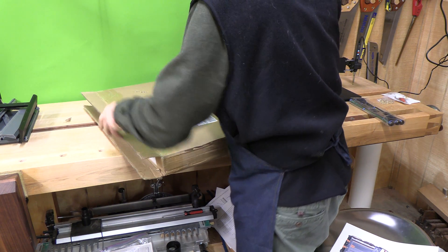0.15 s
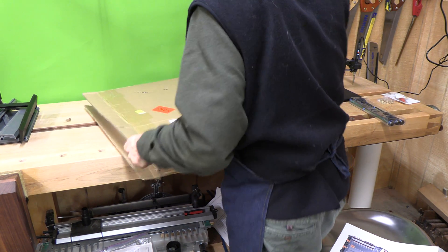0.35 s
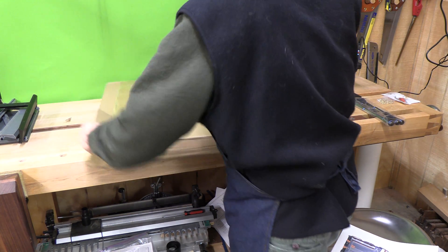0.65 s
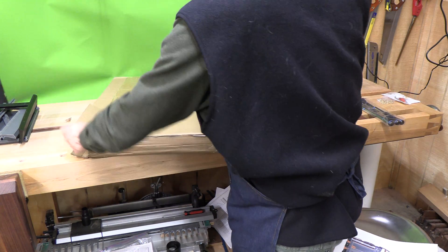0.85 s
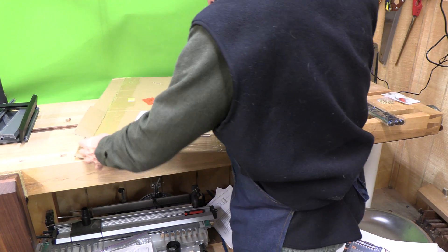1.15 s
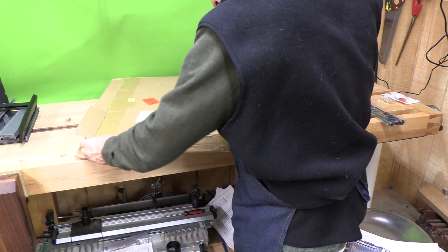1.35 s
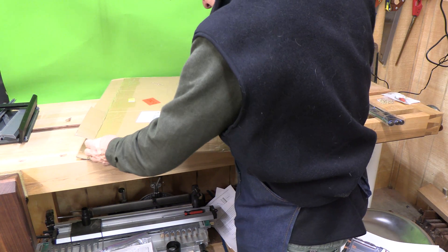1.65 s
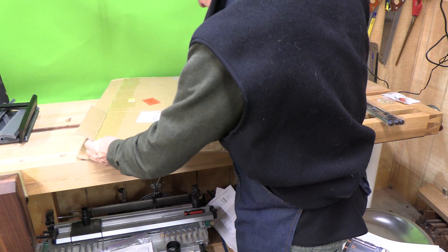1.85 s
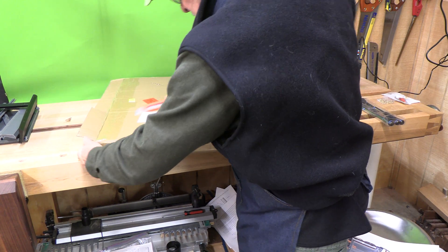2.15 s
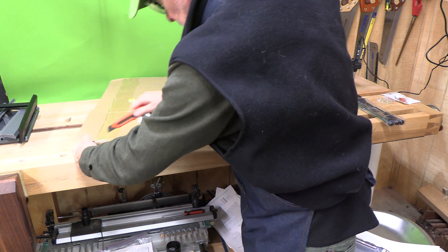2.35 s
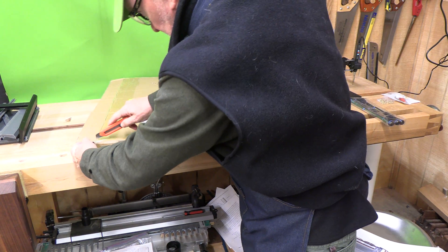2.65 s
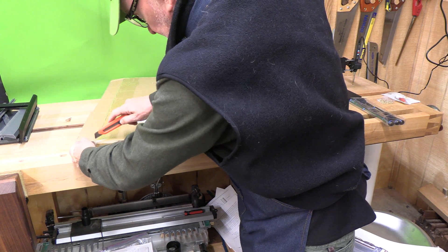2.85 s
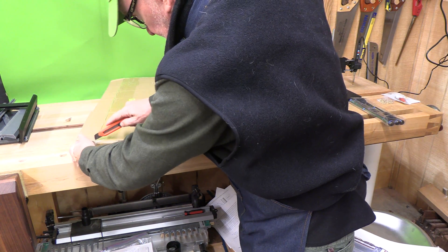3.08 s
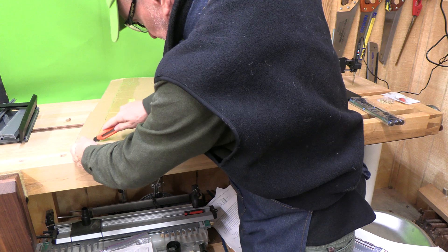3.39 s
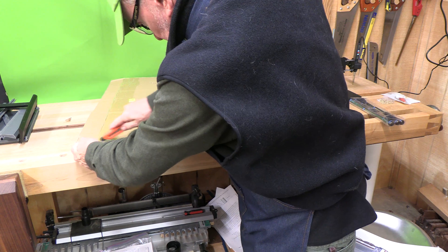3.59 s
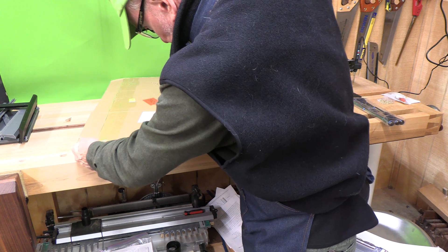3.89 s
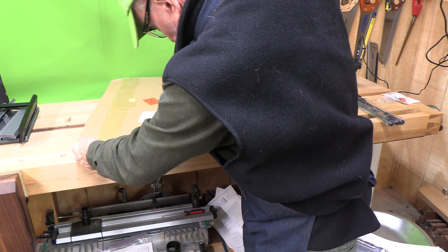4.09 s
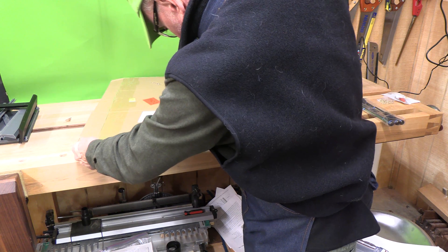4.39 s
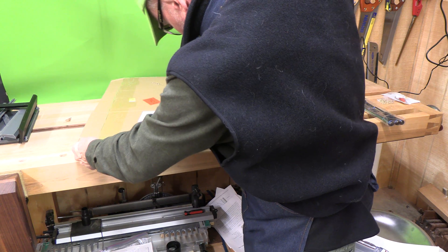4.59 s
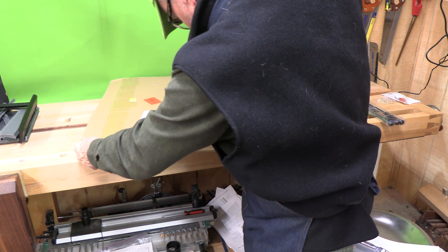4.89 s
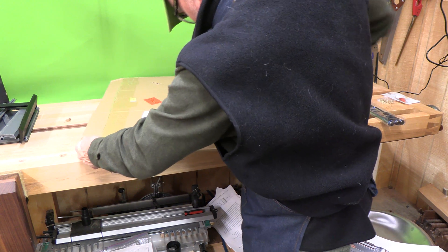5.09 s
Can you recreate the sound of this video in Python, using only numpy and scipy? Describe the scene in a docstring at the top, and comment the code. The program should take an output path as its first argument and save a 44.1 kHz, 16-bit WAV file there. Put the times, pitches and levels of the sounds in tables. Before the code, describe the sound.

In a small workshop, close to a mono microphone, hands flip a flat cardboard box on a wooden bench: rustling, hollow knocks and crisp snaps. Two bright knife-slider clicks follow, then quiet fumbling with faint ticks and one sharp snap. Finally a blade rasps loudly through the board and stops with a jerk and a tiny ping.

```python
"""A cardboard rustle is heard first, then dull knocks and sharp snaps: hands turn a flat box over on a
wooden bench in a small workshop, near a mono microphone. A knife's slider ticks, then its blade rasps
along the board, and a short ping sounds as the cut ends. Rubbing is noise made of many small slips,
knocks and snaps are short bursts of shaped noise, and ticks and pings are fading sine waves."""
import sys
import numpy as np
from scipy import signal
from scipy.io import wavfile
from scipy.ndimage import uniform_filter1d

SR = 44100
rng = np.random.default_rng(int(sys.argv[2]) if len(sys.argv) > 2 else 0)


def to_wav(s):
    """Save 16-bit WAV."""
    ch = np.atleast_2d(s).T  # columns
    pcm = np.round(np.clip(ch, -1, 1) * 32767)  # PCM
    wavfile.write(sys.argv[1], SR, pcm.astype(np.int16))


N = 230710

# steady room tone, the shape of its spectrum: f/Hz, level/dB per Hz
FLOOR = [(15, 2), (25, -22.5), (47, -11.5), (102, -15.5), (242, -9.5), (863, -40), (988, -24), (1840, -20),
         (5430, -45.5), (16000, -44)]
FLOOR_DB = -55.5  # overall rms level

# board rubbing on bench and hands: t/s, level of the fizz/dB, level of the body/dB
RUSTLE = [(0, -40.5, -44), (.11, -40.5, -35), (.24, -39, -43), (.37, -40, -36), (.55, -46, -42.5),
          (.74, -42, -39), (.83, -36, -33), (.92, -38.5, -33), (.98, -41.5, -39), (1.07, -43, -32),
          (1.21, -50, -43), (1.5, -44.5, -39.5), (1.68, -50.5, -45), (1.85, -57, -54), (2.13, -55, -53),
          (2.49, -50.5, -45), (2.65, -51, -50), (2.8, -62, -50), (3, -64, -64), (3.1, -53, -62),
          (3.36, -49, -51), (3.5, -49, -48), (3.65, -48, -47), (3.7, -34, -25.5), (3.77, -26, -22)]
# hiss of the rubbed surface: f/Hz, level/dB per Hz
FIZZ = [(880, -30.5), (1500, -7), (2270, -7.5), (2860, -16), (3270, -3), (4010, -3.5), (4350, -1),
        (7410, -0.5), (9000, -10), (11700, -37.5), (19800, -120)]
# body of the board held down by hand: f/Hz, level/dB per Hz
HELD_BODY = [(71, -28.5), (120, -3), (300, -0.5), (759, -7), (823, -5.5), (1530, -15.5), (3000, -22.5),
             (3900, -74), (6600, -120)]
# low rumble of the bench: f/Hz, level/dB per Hz
RUMBLE = [(25, -38), (45, -22), (65, -8), (87, 2.5), (119, 2), (151, -3.5), (250, -11), (400, -37)]
# highest treble, which also dulls the snaps and swipes above 8 kHz: f/Hz, level/dB per Hz
TOP = [(4410, -28.5), (7500, -4), (12500, -15.5), (15100, -23.5), (16000, -53)]
# ringing of the rubbed board: f/Hz, width/Hz, level over the spectrum/dB
BOARD = [(432, 71, 2.5), (930, 30, 1), (1300, 44, 2), (4700, 250, 1), (5100, 280, 3)]
# how rumble follows the body (row 1) and top treble the fizz (row 2):
# level when the leader is at PIVOT_DB/dB, slope/dB per dB
RUSTLE_LAW = [(-47, .75), (-43, .9)]
PIVOT_DB = -35
# short slides of a flap, finger or blade: t/s, level/dB, length/s, centre f/Hz, spread/octaves
SWIPES = [(0, -26.5, .025, 4170, 1.6), (.162, -32, .1, 5500, .7), (.185, -17.5, .0064, 1680, .37),
          (.202, -24, .012, 1520, .23), (.265, -37, .068, 6130, .3), (.365, -31, .09, 5000, 1.1),
          (.376, -34, .07, 1540, .12), (.45, -34, .058, 5000, 1.5), (.45, -32.5, .032, 890, .54),
          (.494, -18, .014, 5670, .44), (.514, -26, .065, 5200, 1), (.521, -21, .026, 1170, .56),
          (.756, -32, .14, 4100, .35), (.757, -30.5, .09, 580, .15), (.845, -25, .05, 700, .48),
          (.904, -38, .036, 5000, .94), (.99, -30, .043, 5500, .86), (.994, -23.5, .08, 1880, .7),
          (1.215, -38, .2, 3040, 1), (1.413, -36, .015, 3410, .5), (2.108, -46, .11, 4400, .4),
          (2.237, -35, .014, 4120, .7), (2.471, -41, .052, 4950, 1), (2.582, -40.5, .051, 4730, 1.5),
          (2.594, -38, .02, 1490, .48), (2.818, -42, .1, 4250, 1.34), (3.134, -44, .035, 3780, .7),
          (3.184, -33, .02, 4600, 1), (3.425, -32.5, .065, 4870, 1.46), (3.59, -32.5, .11, 5000, 1.4),
          (3.642, -13, .025, 5500, 1.46), (3.693, -10, .0083, 5000, 1.5), (3.708, -11.5, .017, 5000, 1.5),
          (3.727, -10.5, .018, 5000, 1.5), (4.399, -22.5, .06, 3230, 1.3), (4.416, -29.5, .2, 1380, .47),
          (5.041, -15.5, .012, 5300, .88), (5.073, -15, .015, 3880, 1.3), (5.086, -21, .041, 199, .3),
          (5.101, -10.5, .014, 3850, .85), (5.108, -24, .054, 900, .3), (5.115, -23, .045, 6000, 1.1),
          (5.193, -24, .012, 5000, 1)]

# dull knocks of the box: t/s, peak level before the lift in scene()/dB, centre f/Hz,
# time to fall 60 dB (t60)/s, first contact over the push/dB
KNOCKS = [(.085, -31, 350, .06, 28), (.162, -12, 300, .12, 28), (.262, -25, 610, .09, 26),
          (.497, -14, 1110, .08, 40), (.505, -14, 620, .1, 20), (.52, -10, 1080, .08, 38),
          (.679, -29.5, 447, .13, 27), (.855, -15.5, 560, .11, 22), (.996, -5, 290, .25, 26),
          (1.341, -34, 338, .08, 28), (1.56, -17, 520, .095, 13), (1.641, -31, 368, .14, 27),
          (1.886, -30, 428, .1, 19), (2.044, -34, 326, .17, 25), (2.098, -36, 383, .2, 15),
          (2.29, -32, 280, .17, 22), (2.396, -35, 283, .2, 19), (2.692, -20, 450, .09, 23),
          (3.035, -34, 300, .12, 23), (3.137, -31, 1100, .09, 21), (3.178, -32, 452, .14, 11),
          (3.275, -32, 445, .08, 21), (3.43, -29, 330, .15, 10), (3.598, -26, 374, .3, 15),
          (3.643, -13, 500, .1, 18), (3.694, -11, 430, .15, 18), (3.731, -8, 270, .12, 22),
          (4.396, -14, 398, .16, 20), (4.482, -18.5, 441, .14, 20), (4.954, -22, 388, .13, 28),
          (5.046, -23, 450, .1, 28), (5.083, -14, 150, .14, 20), (5.102, -15.5, 200, .15, 9)]
# ringing modes of the cardboard panel: f/Hz, width/Hz, level/dB
PANEL = [(137, 55, 3), (185, 90, -18.5), (245, 34, -1), (278, 102, 2.5), (396, 94, 1.5), (555, 117, 0.5),
         (710, 210, -4), (884, 127, 0.5), (1100, 300, -5.5), (1280, 174, 2), (1483, 600, -6.5),
         (2160, 350, -7.5)]
KNOCK_OCTAVES = 1.15  # spread around the centre of a knock
BENCH_HZ, BENCH_T60 = 105, 1.1  # lowest mode of the bench top, Hz and s
BENCH_DB, THUMP_DB, THUMP_HZ = -33, -21, 130  # bench ring and low thump, dB over the knock's peak
# how long each pitch lingers in the workshop: f/Hz, t60/s
ROOM = [(200, 0.37), (530, 0.099), (1390, 0.54), (3680, 0.54), (9700, 0.057)]

# snaps of fibres, tape and flap edges: t/s, peak level/dB, centre f/Hz, room tail level/dB
SNAPS = [(.1151, -25, 6900, -17), (.1454, -14, 6740, -20), (.1733, -16, 4600, -17), (.1885, -9, 5100, -25),
         (.2054, -9, 5400, -25), (.4865, -16, 5800, -23), (.5, -9, 4930, -19), (.5206, -7, 7280, -30),
         (.525, -4, 5850, -30), (.5385, -14, 7200, -31), (.683, -29, 5790, -25), (.713, -17, 4610, -22),
         (1.0785, -23, 3920, -25), (1.2226, -23, 5780, -14), (1.3404, -19, 3950, -18),
         (1.5604, -24, 3760, -12), (1.7884, -33, 3370, -22), (2.0856, -33, 7000, -23),
         (2.1752, -30, 4570, -25), (2.2257, -27, 4740, -23), (2.256, -27, 7520, -32),
         (2.4854, -28, 4550, -28), (2.5666, -31, 4800, -19), (2.6923, -1.5, 4920, -17),
         (2.8606, -20, 4220, -19), (2.9272, -34, 3070, -33), (3.0401, -13, 4200, -20),
         (3.0796, -34, 2600, -20), (3.1399, -23, 3940, -18), (3.1754, -15, 4130, -18),
         (3.2344, -32, 4310, -21), (3.2793, -18, 5100, -25), (3.38, -15, 4000, -30),
         (3.461, -17, 7160, -40), (3.5433, -34, 3900, -31), (3.6015, -18, 6180, -25),
         (3.7994, -10, 7300, -20), (4.3992, -7, 3030, -18), (4.4822, -11, 5670, -9),
         (4.782, -19, 6140, -19), (4.9353, -16, 6620, -23), (5.066, -14, 3370, -27),
         (5.0744, -3, 3200, -28), (5.1033, -14, 5390, -27), (5.131, -10, 6370, -25),
         (5.1444, -8, 4840, -28)]
# early reflections from bench and walls: delay t/s, level over the room tail/dB
ECHOES = [(.0035, 5.5), (.007, -1), (0.0185, -5), (0.026, -5.5)]
SNAP_T60, SNAP_OCTAVES = .0075, 1.15  # s, spread of the wide part of the colour
CRACKLES, CRACKLE_DB = 10, 14  # number of faint random snaps, most dB over the fizz
CRACKLE_LOW_HZ, CRACKLE_HIGH_HZ, CRACKLE_TAIL_DB = 3000, 8000, -25

# ticks of the knife's slider: t/s, peak level/dB, pitch f/Hz
TICKS = [(1.1986, -30, 2330), (1.3118, .4, 2200), (1.4336, -1.5, 2316), (1.7594, -27, 2110),
         (1.801, -37, 2030), (1.8407, -35, 2230), (1.8696, -32, 2180), (1.9168, -28, 2030),
         (1.9889, -31, 2240), (2.029, -37, 1930), (2.051, -23, 2290), (2.1011, -35, 1950),
         (2.1345, -29, 1960), (2.2115, -33, 2100), (2.2405, -22, 2290), (2.345, -34, 1900)]
# ringing modes of the knife's handle: multiple of the pitch, level/dB
KNIFE = [(1, 9.5), (1.68, 10), (2.42, 1), (2.85, 0.5), (3.9, -0.5), (5.2, -12)]
TICK_T60, T60_PER_DB = .008, -.00012  # s at 0 dB, s per dB: harder ticks are shorter
UPPER_PER_DB, TICK_TAIL_DB = .27, -20  # harder ticks are brighter (dB per dB); room tail

# the slit board sounds in two bands as the blade moves:
# t/s, low band f/Hz, low band level over the fizz/dB, high band f/Hz
SLIT = [(3.74, 5550, -11, 7500), (3.95, 5750, -14, 7500), (4.1, 4470, -13, 7300), (4.3, 3340, -14, 7700),
        (4.42, 3540, -8, 7540), (4.62, 3450, -8, 6800), (4.9, 3390, -4, 6540), (5.04, 3400, -7, 6200),
        (5.15, 3430, -20, 7400)]
SLIT_HIGH_DB = -9  # high band over the fizz of the rasp
# the blade's long pull and the jerk that ends it: t/s, level of the fizz/dB, level of the body/dB
RASP = [(3.76, -23.5, -23), (3.83, -22, -24), (3.94, -26, -30.5), (3.964, -24, -26.5), (4.2, -28.5, -31.5),
        (4.28, -21, -27), (4.38, -25, -29), (4.404, -20, -19.5), (4.56, -25, -27), (4.65, -25, -22.5),
        (4.73, -31.5, -32), (4.812, -37.5, -40), (4.928, -35, -36.5), (4.96, -29, -31), (5.033, -27.5, -27),
        (5.037, -17.5, -19), (5.111, -23.5, -18), (5.147, -18, -24), (5.173, -28, -29),
        (5.203, -28.5, -29.5), (5.23, -42, -41)]
# body of the board under the blade: f/Hz, level/dB per Hz
BODY = [(30, -35), (80, -12), (120, -6.5), (266, -3.5), (304, -3.5), (443, 0), (770, -5.5), (869, -3),
        (2260, -10), (3000, -17.5), (3900, -37.5), (6600, -120)]
# the same two following rules as RUSTLE_LAW: level at PIVOT_DB/dB, slope/dB per dB
RASP_LAW = [(-50, .5), (-44, 1.2)]

# short tone as the cut ends: t/s, peak level/dB
PINGS = [(5.1965, -21), (5.203, -18)]
# its close modes: f/Hz, level/dB, t60/s
PING = [(2380, -2, .05), (2482, 0, .08), (2600, -9, .04)]

EDGE_HZ = 16100  # upper band limit of the output


def amp(db):
    """Turns dB into a gain."""
    return 10 ** (np.asarray(db) / 20)


def evened(x):
    """Scales a signal to an rms of 1."""
    return x / np.sqrt(np.mean(x ** 2) + 1e-20)


def read(points, hz):
    """Reads a table between its points on a log-frequency axis."""
    f, value = np.transpose(points)
    return np.interp(np.log(hz + 1), np.log(f + 1), value)


def add(mix, s, peak_db, sound):
    """Mixes a sound in at time s with the given peak."""
    part = mix[max(round(s * SR), 0):][:len(sound)]
    part += amp(peak_db) * sound[:len(part)] / abs(sound).max()


def colour(x, gain):
    """Filters by a gain curve over Hz; like a real body, it answers only after it is driven."""
    hz = abs(np.fft.fftfreq(4096, 1 / SR))
    log_gain = np.log(np.maximum(gain(hz), 1e-5))
    spectrum = np.exp(np.conj(signal.hilbert(log_gain)))  # minimum phase
    taps = np.fft.ifft(spectrum).real[:2048]
    return signal.oaconvolve(x, taps)[:len(x)]


def hump(hz, centre_hz, octaves):
    """A bell-shaped gain on a log-frequency axis."""
    return np.exp(-.5 * (np.log2((hz + 1) / centre_hz) / octaves) ** 2)


def dulled(hz):
    """Gain that is level up to 8 kHz, then follows the top treble."""
    return amp(read(TOP, np.maximum(hz, 8000)))


def patchy(x, patch_db):
    """Colour drifts in random patches of time and pitch, as when parts of the board are held or let go."""
    hz, t, z = signal.stft(x, SR, nperseg=512, noverlap=384)
    patches = rng.standard_normal(z.shape[::-1]).T
    patches = uniform_filter1d(patches, size=4, axis=0)
    patches = evened(uniform_filter1d(patches, size=40, axis=1))
    return signal.istft(z * amp(patch_db * patches), SR, nperseg=512, noverlap=384)[1][:N]


def room_tone():
    """Steady noise shaped by the room's own spectrum."""
    return amp(FLOOR_DB) * evened(colour(rng.standard_normal(N), lambda hz: amp(read(FLOOR, hz))))


def friction(per_s, spread_db, smooth, flutter_db):
    """Fibres slip as dense clicks of uneven size over a smooth hiss; the pressure flutters."""
    happens = rng.random(N) < per_s / SR
    size = amp(spread_db * np.minimum(rng.exponential(1, N), 5)) * happens
    slips = evened(size * rng.standard_normal(N))
    wander = uniform_filter1d(rng.standard_normal(N), 500)
    wander = evened(uniform_filter1d(wander, 500))
    drive = smooth * rng.standard_normal(N) + (1 - smooth) * slips
    return amp(flutter_db * wander), drive


def rub(rows, law, body, per_s, spread_db, smooth, flutter_db):
    """Friction drives the fizz of the surface, the body of the board and the rumble of the bench."""
    s, fizz_db, body_db = np.transpose(rows)
    (rumble_base, rumble_slope), (top_base, top_slope) = law
    rumble_db = rumble_base + rumble_slope * (body_db - PIVOT_DB)
    top_db = top_base + top_slope * (fizz_db - PIVOT_DB)
    t = np.arange(N) / SR
    flutter, drive = friction(per_s, spread_db, smooth, flutter_db)

    def ringing_db(hz):
        return sum(d / (1 + (2 * (hz - f) / w) ** 2) for f, w, d in BOARD)

    out = np.zeros(N)
    for shape, db in zip((FIZZ, body, RUMBLE, TOP), (fizz_db, body_db, rumble_db, top_db)):
        layer = evened(colour(drive, lambda hz: amp(read(shape, hz) + ringing_db(hz))))
        out += amp(np.interp(t, s, db, -120, -120)) * layer
    return out * evened(flutter)


def swipes():
    """Grainy friction noise sets in fast, weakens as the piece slides and leaves a fading room tail."""
    out, t = np.zeros(N), np.arange(16384) / SR
    drive = friction(4000, 4.0, 0.75, 0)[1]
    starts = rng.integers(0, N - len(t), len(SWIPES))
    for (s, db, length, centre_hz, octaves), at in zip(SWIPES, starts):
        grain = drive[at:at + len(t)]
        slide = evened(colour(grain, lambda hz: hump(hz, centre_hz, octaves) * dulled(hz)))
        onset = np.clip(t / (0.074 * length), 0, 1)
        sliding = onset * np.clip((0.91 * length - t) / (0.94 * length), 0, 1)
        fading = amp(-13 - 60 * np.maximum(t - length, 0) / 0.19) * np.clip(t / length, 0, 1)
        part = out[round(max(s, 0) * SR):][:len(t)]
        part += (amp(db) * slide * (sliding + fading))[:len(part)]
    return out


def knocks():
    """A hard contact and a rough push ring the panel modes; the bench below thumps and rings."""
    out, t, long = np.zeros(N), np.arange(8192) / SR, np.arange(SR // 2) / SR
    bench = np.sin(2 * np.pi * BENCH_HZ * long) * amp(-60 * long / BENCH_T60)
    bench *= 1 - np.exp(-long / 0.005)  # soft start

    def modes(hz):
        # neighbouring modes move in opposite directions
        return abs(sum((-1) ** k * amp(d) / (1 + 2j * (hz - f) / w) for k, (f, w, d) in enumerate(PANEL)))

    def radiated(hz):
        return 1 / np.sqrt(1 + (210 / (hz + 1)) ** 4)  # a small panel gives off little bass

    noises = rng.standard_normal((len(KNOCKS), 8192))
    for (s, db, centre_hz, t60, contact_db), noise in zip(KNOCKS, noises):
        push = noise * (1 - np.exp(-t / 0.0036)) * amp(-60 * t / t60)
        add(out, s, db + THUMP_DB, colour(push, lambda hz: hump(hz, THUMP_HZ, .75)))
        add(push, .002, contact_db, np.ones(1))  # the contact is a single click
        spot = lambda hz: hump(hz, centre_hz, KNOCK_OCTAVES)
        add(out, s, db, colour(push, lambda hz: modes(hz) * radiated(hz) * spot(hz)))
        add(out, s, db + BENCH_DB, bench)
    return out


def workshop(x, tail_db):
    """Room reflections: sparse taps of random sign, each band dying at its own speed."""
    taps = np.zeros(SR // 2)
    at = np.arange(200, SR // 2 - 20, 20)
    taps[at + rng.integers(0, 20, len(at))] = rng.choice([-1., 1.], len(at))
    hz, t, z = signal.stft(taps, SR, nperseg=256)
    decay = amp(-60 * t / read(ROOM, hz)[:, None])
    tail = signal.istft(z * decay, SR, nperseg=256)[1]
    return x + signal.fftconvolve(x, amp(tail_db) * tail / np.linalg.norm(tail))[:N]


def with_tail(click, noise, tail_db, gain):
    """Adds early echoes and a fading noise tail, with fresh noise for every click."""
    t = np.arange(len(noise)) / SR
    tail = evened(colour(noise, gain)) * amp(tail_db - 60 * t / 0.16) * (1 - np.exp(-t / 0.001))
    add(tail, 0, 0, click)
    for delay, db in ECHOES:
        add(tail, delay, db + tail_db, click)
    return tail


def crackle():
    """Rows of faint snaps at random moments, whose peaks follow the fizz of the rustle."""
    when, pitch, size = rng.random((CRACKLES, 3)).T
    s, fizz_db, _ = np.transpose(RUSTLE)
    when = when * s[-1]
    peak_db = np.interp(when, s, fizz_db) + CRACKLE_DB * size
    centre_hz = CRACKLE_LOW_HZ + (CRACKLE_HIGH_HZ - CRACKLE_LOW_HZ) * pitch
    return list(zip(when, peak_db, centre_hz, np.full(CRACKLES, CRACKLE_TAIL_DB)))


def snaps():
    """A crack of noise that starts at once, coloured by the piece that lets go."""
    out, t = np.zeros(N), np.arange(8192) / SR
    rows = list(SNAPS) + crackle()
    for (s, db, centre_hz, tail_db), noise in zip(rows, rng.standard_normal((len(rows), 8192))):
        def gain(hz):
            narrow, wide = hump(hz, centre_hz, 0.084), hump(hz, centre_hz, SNAP_OCTAVES)
            return (narrow + 0.74 * wide) * dulled(hz)

        crack = colour(noise * amp(-60 * t / SNAP_T60), gain)
        add(out, s, db, with_tail(crack, noise[::-1], tail_db, gain))
    return out


def ticks():
    """The plastic handle rings briefly in a few modes; higher modes die sooner."""
    out, t = np.zeros(N), np.arange(8192) / SR
    for (s, db, pitch_hz), noise in zip(TICKS, rng.standard_normal((len(TICKS), 8192))):
        t60 = TICK_T60 + T60_PER_DB * db
        modes = [(m, d + UPPER_PER_DB * db * (k > 0)) for k, (m, d) in enumerate(KNIFE)]
        ring = np.zeros(len(t))
        for k, (m, mode_db) in enumerate(modes):
            wave = np.sin(2 * np.pi * (m * pitch_hz * t + noise[k]))  # random phase
            ring += amp(mode_db - 60 * t * m ** 0.19 / t60) * wave
        gain = lambda hz: sum(amp(mode_db) * hump(hz, m * pitch_hz, 0.2) for m, mode_db in modes)
        click = ring * (1 - np.exp(-t / 0.00013))
        add(out, s, db, with_tail(click, noise, TICK_TAIL_DB, gain))
    return out


def resonate(x, hz, width_hz):
    """A moving resonance: shifts the curve hz down to zero, smooths, and shifts back."""
    turn = np.exp(2j * np.pi * np.cumsum(hz) / SR)
    r = np.exp(-np.pi * width_hz / SR)
    return 2 * (turn * signal.lfilter([1 - r], [1, -r], x / turn)).real


def slit():
    """Friction noise rings in two bands that follow the blade."""
    t = np.arange(N) / SR
    s, *columns = np.transpose(SLIT)
    low_hz, low_db, high_hz = (np.interp(t, s, c) for c in columns)
    fizz_db = np.interp(t, *np.transpose(RASP)[:2])
    flutter, drive = friction(4200, 2.5, 0.6, 1.5)
    low = evened(resonate(resonate(drive, low_hz, 640), low_hz, 640))
    high = evened(resonate(resonate(drive, high_hz, 1000), high_hz, 1000))
    both = amp(fizz_db + low_db) * low + amp(fizz_db + SLIT_HIGH_DB) * high
    return both * evened(flutter) * (t > s[0])


def ping():
    """Close modes beat against each other as they die."""
    out, t = np.zeros(N), np.arange(4096) / SR
    ring = sum(amp(db - 60 * t / t60) * np.sin(2 * np.pi * hz * t) for hz, db, t60 in PING)
    for s, db in PINGS:
        add(out, s, db, ring * (1 - np.exp(-t / 0.00033)))
    return out


def scene():
    """Lays knocks, snaps, ticks and pings over the rubbing and the room tone, alike in both channels."""
    rustle = rub(RUSTLE, RUSTLE_LAW, HELD_BODY, per_s=2500, spread_db=1.7, smooth=0.68, flutter_db=2.4)
    handling = patchy(swipes() + rustle, 1.7)
    blows = workshop(amp(2.0) * knocks(), -7.0) + snaps() + ticks() + ping()
    rasp = rub(RASP, RASP_LAW, BODY, per_s=6000, spread_db=2.9, smooth=0.45, flutter_db=0.51)
    cutting = patchy(slit() + rasp, 1.54)
    return np.tile(room_tone() + handling + blows + cutting, (2, 1))


def record(dry):
    """Squeezes the loudest peaks softly, then cuts off the highest treble."""
    squeezed = dry / (1 + (abs(dry) / .93) ** 6) ** (1 / 6)
    low_pass = signal.firwin(511, EDGE_HZ, window=("kaiser", 9), fs=SR)
    return signal.oaconvolve(squeezed, low_pass[None], "same")


dry = scene()
out = record(dry)
to_wav(out)
```